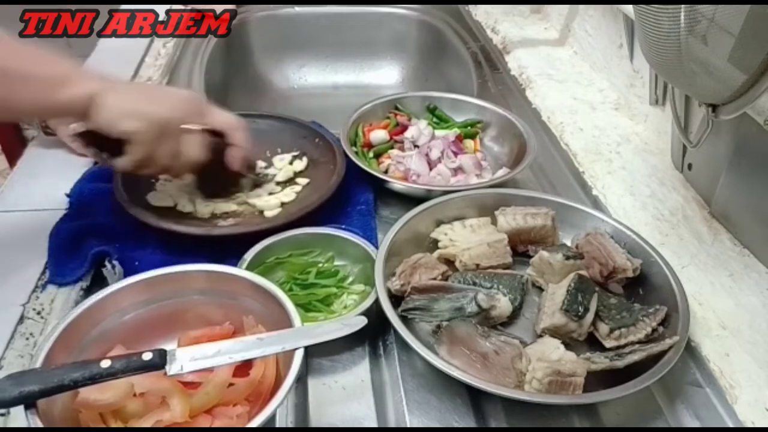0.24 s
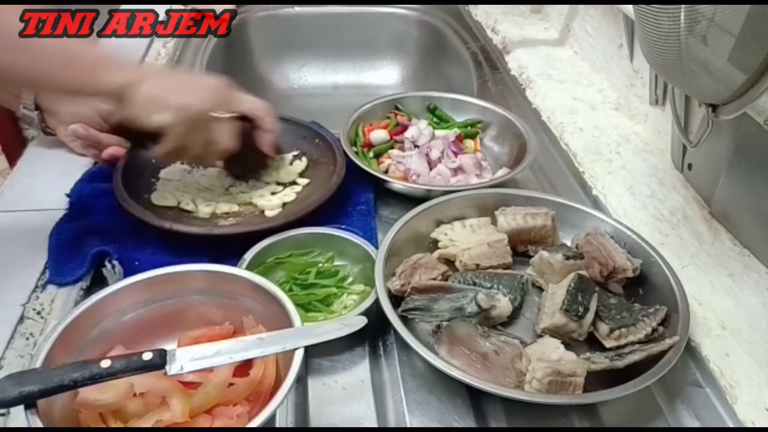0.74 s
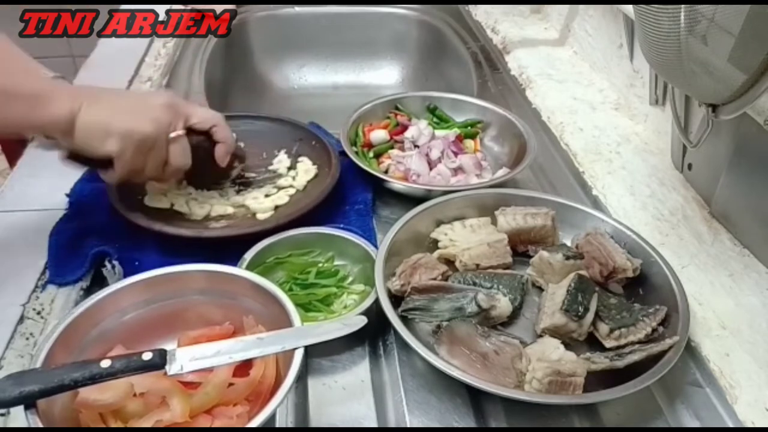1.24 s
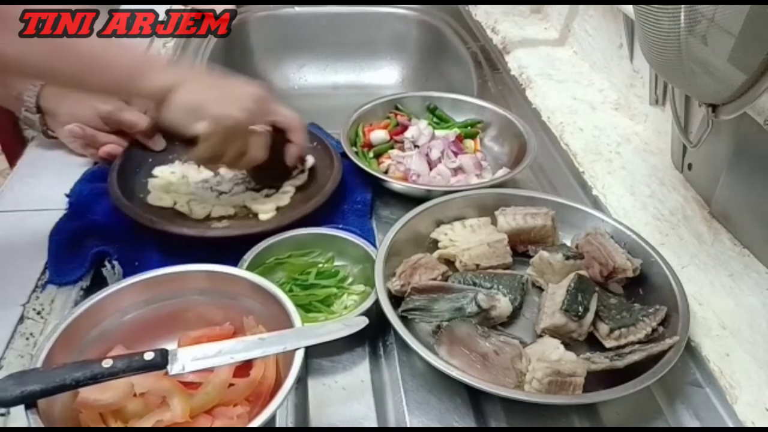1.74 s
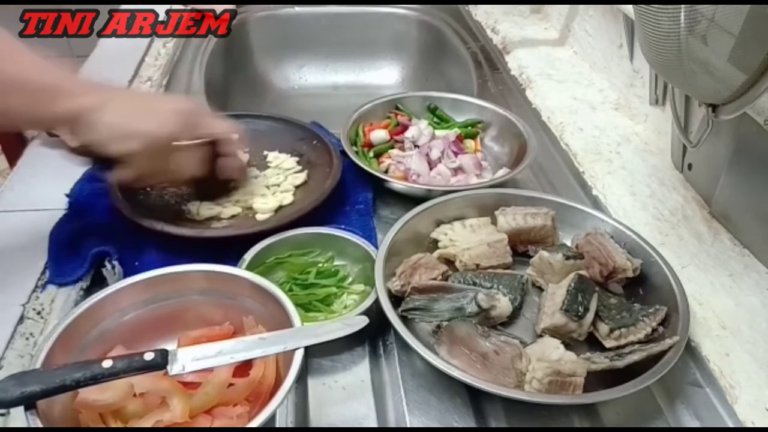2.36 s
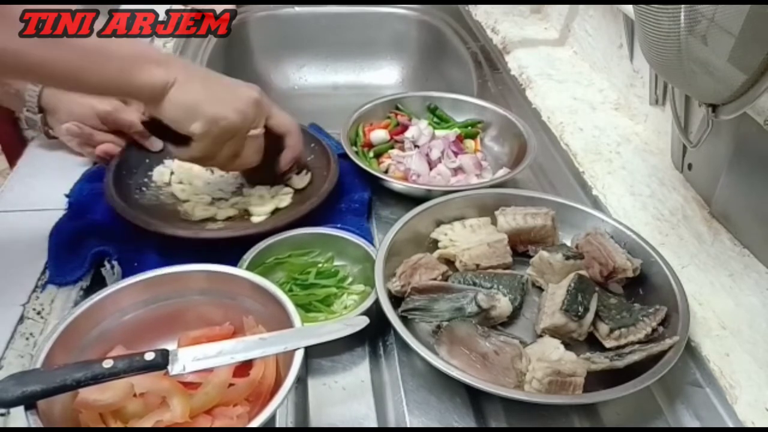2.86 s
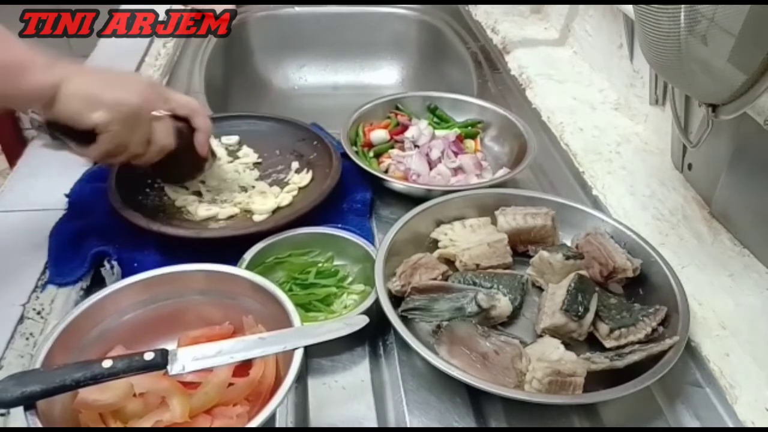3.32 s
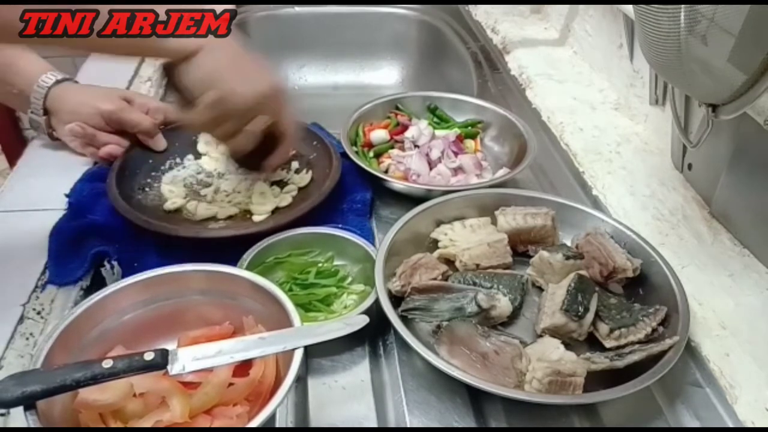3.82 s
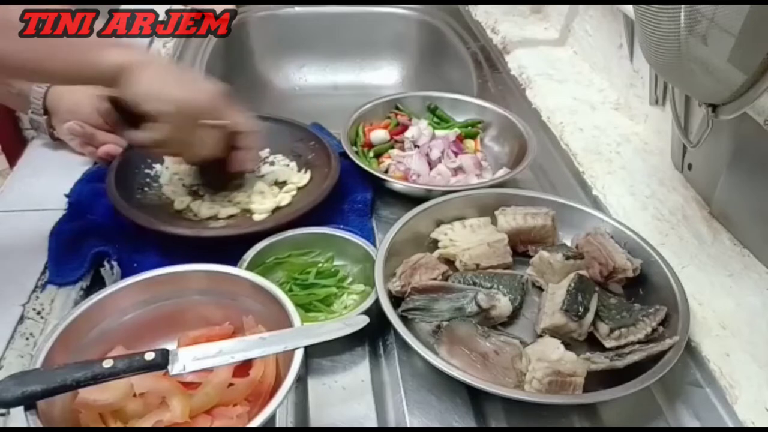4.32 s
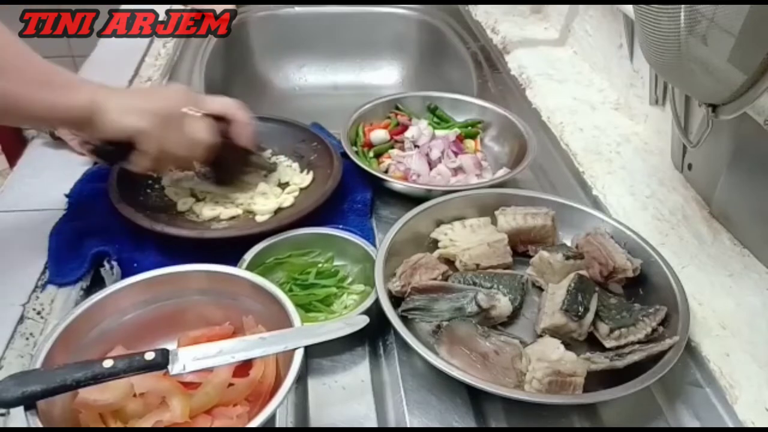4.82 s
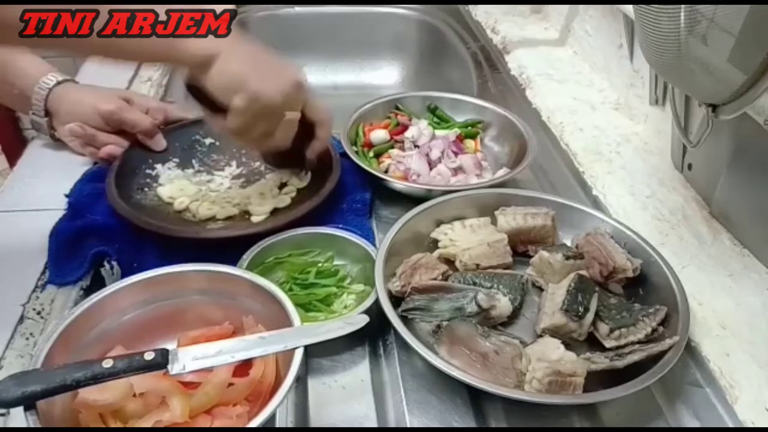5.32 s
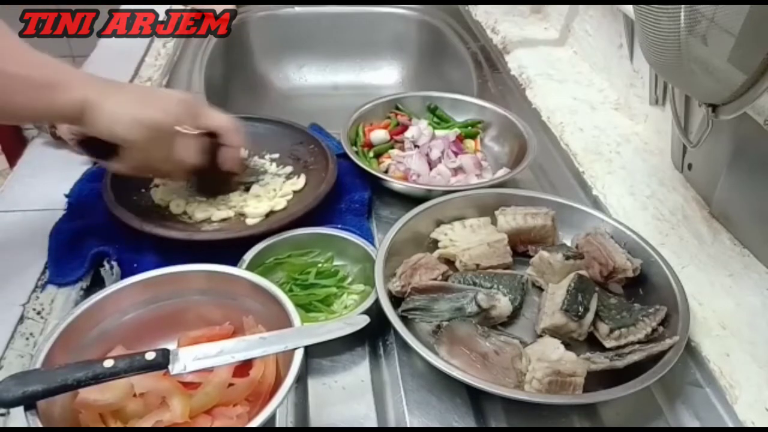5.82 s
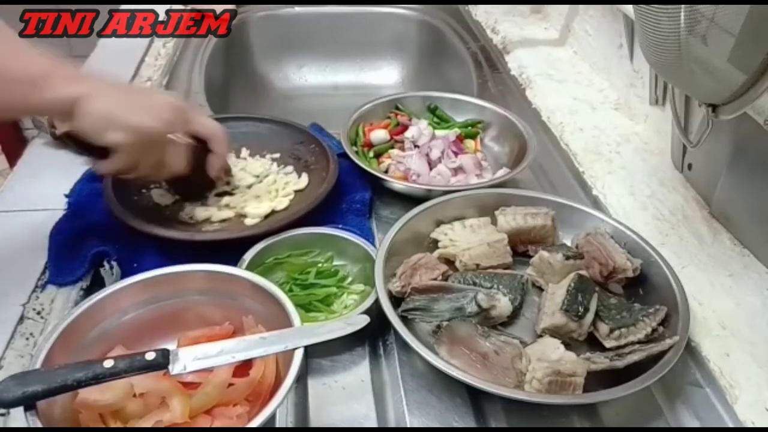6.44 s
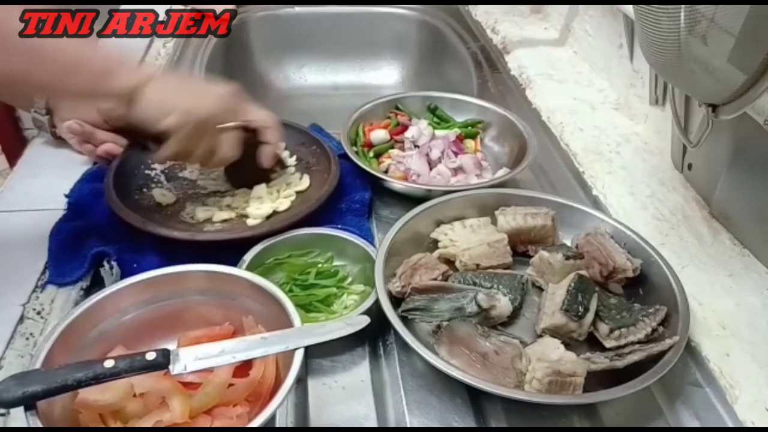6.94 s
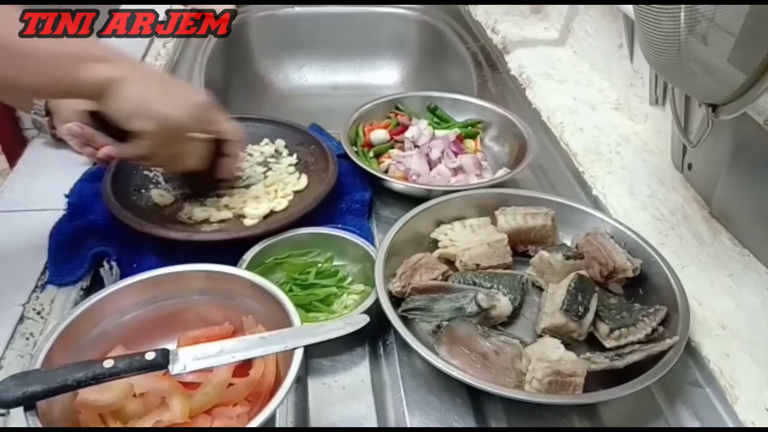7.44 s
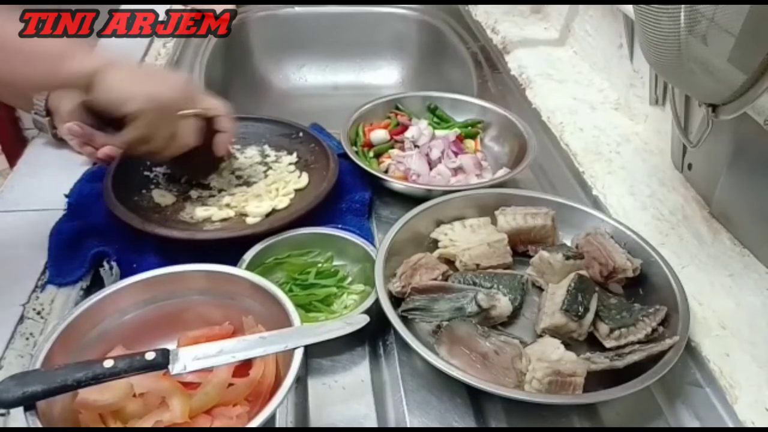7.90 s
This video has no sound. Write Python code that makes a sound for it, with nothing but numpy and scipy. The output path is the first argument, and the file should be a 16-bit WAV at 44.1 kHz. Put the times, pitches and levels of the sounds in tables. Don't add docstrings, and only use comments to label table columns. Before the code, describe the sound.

Gritty stone-on-stone rubbing runs throughout, several strokes a second, alternating heavy crushing rasps with lighter hissy drags. Two firm knocks open the first second, a bracelet clinks on the rim, and the hardest knock falls at five seconds. Later strokes grow softer and duller, with low rattles and hollow tocks. Short kitchen echoes surround the close phone sound.

```python
import sys
import numpy as np
from scipy import signal
from scipy.fft import rfft, irfft, next_fast_len
from scipy.io import wavfile
from scipy.ndimage import uniform_filter1d

SR = 44100
rng = np.random.default_rng(int(sys.argv[2]) if len(sys.argv) > 2 else 0)


def to_wav(s):
    ch = np.atleast_2d(s).T
    pcm = np.round(np.clip(ch, -1, 1) * 32767)
    wavfile.write(sys.argv[1], SR, pcm.astype(np.int16))


def convert_level_to_amplitude(level_db):
    exponent = np.asarray(level_db, float) / 20
    return 10 ** exponent


N = 360297


def evened(x):
    return x / np.sqrt(np.mean(np.atleast_2d(x).mean(0) ** 2) + 1e-20)


def read(points, hz):
    f, value = np.transpose(points)
    return np.interp(np.log(hz + 1), np.log(f + 1), value)


def colour(x, points, lo_hz=0, hi_hz=3e4):
    size = next_fast_len(N + 4096)
    hz = np.fft.rfftfreq(size, 1 / SR) + 1
    edges = np.sqrt(1 / (1 + (lo_hz / hz) ** 6) / (1 + (hz / hi_hz) ** 6))
    return irfft(rfft(x, size) * convert_level_to_amplitude(read(points, hz)) * edges, size)[..., :N]


def ring(x, hz, width):
    r = np.exp(-np.pi * width / SR)
    return signal.lfilter([1 - r * r, 0, r * r - 1], [2, -4 * r * np.cos(2 * np.pi * hz / SR), 2 * r * r], x)


def drift(rate):
    knots = np.arange(int(N / SR * rate) + 2) / rate
    return np.interp(np.arange(N) / SR, knots, rng.standard_normal(len(knots)))


def struck(hits, modes):
    t = np.arange(16000) / SR
    out = np.zeros(N)
    for at, hit_db in hits:
        decay = 0
        for hz, db, t60 in modes:
            envelope = convert_level_to_amplitude(hit_db + db + rng.standard_normal() - 60 * t / t60)
            onset = np.minimum(t * hz / 3, 1)
            decay = decay + envelope * onset * np.sin(2 * np.pi * hz * t)
        part = out[round(at * SR):][:len(t)]
        part += decay[:len(part)]
    return out


# peak [t/s], rubbing [level/dB], rise [t/s], fall [t/s],
# low body re rubbing [level/dB]
CRUSHING_STROKES = [(0.584, -34.5, 0.061, 0.12, -8), (1.353, -29, 0.059, 0.059, -13.5),
                    (1.593, -36.5, 0.04, 0.12, -8), (2.014, -28.5, 0.082, 0.091, -10.5),
                    (2.709, -35.5, 0.016, 0.087, -8), (3.399, -31, 0.052, 0.11, -8),
                    (3.768, -29, 0.071, 0.08, -6.5), (3.913, -29.5, 0.031, 0.074, -16.5),
                    (4.057, -32.5, 0.067, 0.087, -10), (4.647, -29, 0.044, 0.044, -10),
                    (4.783, -33.5, 0.11, 0.097, -10.5), (5.18, -30, 0.1, 0.081, -5),
                    (5.499, -37.5, 0.1, 0.085, -3.5), (5.9, -33.5, 0.083, 0.081, -6.5),
                    (6.057, -36, 0.07, 0.052, -1.5), (6.181, -39.5, 0.089, 0.098, -1.5),
                    (6.525, -29, 0.02, 0.1, -9.5), (6.748, -36.5, 0.057, 0.033, -24),
                    (6.886, -38, 0.18, 0.078, -6.5), (7.128, -43.5, 0.099, 0.03, -2),
                    (7.244, -35, 0.088, 0.095, -2.5), (7.608, -38.5, 0.15, 0.12, 2),
                    (7.778, -38, 0.049, 0.082, -9.5), (7.917, -39, 0.13, 0.069, -3.5)]
DRAWING_STROKES = [(0, -92.5, 0.02, 0.05, -3), (0.208, -44, 0.082, 0.02, -22.5),
                   (0.262, -47.5, 0.023, 0.027, -27), (0.348, -38.5, 0.12, 0.06, -9.5),
                   (0.476, -47.5, 0.043, 0.068, -6.5), (0.972, -37.5, 0.067, 0.13, -12.5),
                   (1.197, -40.5, 0.054, 0.065, -51), (1.51, -42, 0.18, 0.045, -16.5),
                   (1.831, -58, 0.02, 0.14, 3), (1.901, -40, 0.068, 0.067, -11.5),
                   (2.3, -66.5, 0.02, 0.033, -1), (2.382, -33.5, 0.064, 0.13, 0),
                   (2.44, -34.5, 0.032, 0.046, -9), (2.563, -45, 0.043, 0.099, -26),
                   (2.981, -41, 0.048, 0.12, -15), (3.13, -31, 0.062, 0.073, -8.5),
                   (3.278, -37.5, 0.061, 0.065, -2.5), (3.683, -63.5, 0.029, 0.035, -10),
                   (4.349, -37, 0.067, 0.083, -9.5), (4.472, -36.5, 0.044, 0.13, -6),
                   (5.391, -43.5, 0.11, 0.02, -19), (5.778, -43, 0.091, 0.02, -10),
                   (6.598, -44, 0.12, 0.019, 1), (7.506, -45.5, 0.056, 0.11, 7)]
# start [t/s], rubbing [level/dB], fall [t/s],
SKIDS = [(0.094, -35.5, 0.08, 5, -22), (0.879, -30, 0.048, 0, -12), (2.649, -34.5, 0.034, -4.5, -13),
         (2.916, -45.5, 0.069, 8.5, -12), (4.269, -49, 0.12, 7.5, -7), (5.0441, -32, 0.042, 6, -21),
         (5.677, -46.5, 0.13, 9.5, -11), (6.448, -44, 0.052, 9, -2.5), (7.445, -46.5, 0.18, -5, -15),
         (7.983, -59.5, 0.08, 8, -15.5), (8.117, -51, 0.2, 3.5, -14)]


def strokes():
    t = np.arange(0, N + 32, 32) / SR
    skid_rise_s, body_lag_s = 0.0038, 0.0033
    swell_at_rise_db, swell_curve = -22.5, 1.316
    skids = [(s, db, skid_rise_s, fall, body_db) for s, db, fall, body_db, _ in SKIDS]
    skid_fine_db = np.array(SKIDS)[:, 4:]
    # rows, fine grit [dB re rubbing], push on the counter [dB re rubbing]
    kinds = (CRUSHING_STROKES, -9.5, -12), (DRAWING_STROKES, -3, -11.5), (skids, skid_fine_db, -34)
    power = 0
    for rows, fine_db, push_db in kinds:
        s, db, rise, fall, body_db = np.transpose(rows)[..., None]

        def swell_db(u):
            return swell_at_rise_db * (abs(u) / np.where(u < 0, rise, fall)) ** swell_curve

        scrape_swell_db = swell_db(t - s)
        body_swell_db = swell_db(t - s - body_lag_s)
        extra_db = db + 33
        layers_db = [
            push_db - 0.26 * extra_db + 0.15 * (body_db + 12.5) + 0.84 * body_swell_db,
            body_db + 1.31 * body_swell_db,
            scrape_swell_db,
            fine_db - 0.42 * extra_db + 0.87 * scrape_swell_db]
        power = power + (convert_level_to_amplitude(np.maximum(db + np.array(layers_db), -200)) ** 2).sum(1)
    return [np.interp(np.arange(N) / SR, t, p) for p in power]


def grit(per_s=2500, spread_db=4.5, smooth=0.72):
    sizes = convert_level_to_amplitude(spread_db * np.minimum(rng.exponential(1, N), 4))
    clicks = rng.standard_normal(N) * (rng.random(N) < per_s / SR) * sizes
    return evened(clicks) + smooth * rng.standard_normal(N)


# centre [f/Hz], width [f/Hz], over the broad colour [level/dB]
STONE_MODES = [(291, 32.7, 3.5), (467, 26.7, 8), (592, 28.5, 5), (694, 28, -1), (891, 20, -4.5),
               (1182, 22, 6), (1340, 38.5, 2.5), (1727, 48, 3), (1869, 23.3, 7), (2066, 44, 2),
               (2156, 60, 3), (2348, 126, 8.5), (2451, 130, 3), (2400, 44, -4), (2710, 210, -13),
               (3370, 66, 8.5), (3520, 170, 4), (4670, 166, 4.5), (5860, 157, 1.5), (6213, 94, 6),
               (8100, 820, 2)]


def stone(drive, wander_db=4.0):
    modes = 0
    for k, (hz, width, db) in enumerate(STONE_MODES):
        wandering = drive * convert_level_to_amplitude(wander_db * drift(9.))
        modes = modes + (-1) ** k * convert_level_to_amplitude(db) * ring(wandering, hz, max(width, 45 + 0.015 * hz))
    return 0.38 * drive + modes


# [t/s], peak [level/dB], low thud re peak [level/dB]
PASTE_CATCHES = [(0.249, -22, -31), (1.1603, -55, -28), (1.5698, -33, -10), (2.3256, -25.5, 2.5),
                 (2.3543, -32, 14), (3.7123, -19, -29), (3.906, -15.5, -32), (4.279, -38, 8),
                 (4.4443, -28.5, -28), (4.6144, -35, 1), (4.6439, -19, -4.5), (5.1412, -24.5, 1.5),
                 (5.6942, -29.5, 9.5), (6.5204, -30.5, -23), (6.859, -21.5, -1.5), (7.1053, -33, 7),
                 (8.1534, -46, -4)]
# [f/Hz], per Hz [level/dB]
STONE_COLOUR = [(150, -16.5), (230, 0), (400, -12), (700, -10.5), (1100, -14), (1600, -6.5), (2400, 0.5),
                (3100, -4.5), (4300, -11), (5300, -11), (6200, -7), (7000, -13.5), (9000, -24),
                (15500, -34.5)]


def pestle(push, body, scrape, fine):
    t, catch_t60_s = np.arange(6000) / SR, 0.028
    for at, db, thud_db in PASTE_CATCHES:
        start = round(at * SR)
        burst = np.zeros(N)
        burst[start:][:6000] = convert_level_to_amplitude(db - 6 - 60 * t[:N - start] / catch_t60_s) ** 2
        body = body + burst * convert_level_to_amplitude(thud_db) ** 2
        scrape = scrape + burst
        fine = fine + 0.032 * burst
    grains = np.array([grit(), grit()])
    bands = (push, 170, 430), (body, 430, 1100), (scrape, 1100, 4000), (fine, 4000, 3e4)  # power, f/Hz
    face, rim = sum(np.sqrt(power) * evened(colour(grains, STONE_COLOUR, lo_hz, hi_hz))
                    for power, lo_hz, hi_hz in bands)
    return convert_level_to_amplitude(-8.5) * stone(face), convert_level_to_amplitude(-8.5) * rim


# [t/s], peak [level/dB], pitch of the crack [f/Hz],
# rattle re crack [level/dB], rattle centre [f/Hz]
STONE_KNOCKS = [
    (0.095, -7, 1950, -7.5, 2220),
    (0.88, -5, 1980, -11, 2260),
    (2.914, -22.5, 2800, -13, 2600),
    (4.27, -22.5, 2000, -7, 735),
    (5.0437, -3, 2130, -10, 1890),
    (5.677, -18, 1980, 6, 646),
    (6.451, -21, 2120, 8.5, 666),
    (8.118, -35, 2050, 2.5, 748),
]


def knocks():
    out = np.zeros(N)
    t = np.arange(-60, 2000) / SR
    for at, db, hz, rattle_db, rattle_hz in STONE_KNOCKS:
        crack = -np.cos(2 * np.pi * hz * t + 0.89) * np.exp(-(t * hz / 0.61) ** 2)
        rattle = (t > 0) * convert_level_to_amplitude(rattle_db - 60 * t / 0.013) * rng.standard_normal(len(t))
        band = signal.butter(3, [rattle_hz * .45, rattle_hz * 1.9], "band", fs=SR, output="sos")
        out[round(at * SR) - 60:][:len(t)] += convert_level_to_amplitude(db) * (crack + signal.sosfilt(band, rattle))
    return out


# [f/Hz], [level/dB], [t60/s]
BOWL_MODES = [(700, -9, .2), (1981, 0, .6), (2353, -6, .4), (2536, -12, .4), (3144, -12, .35),
              (4032, -5, .5), (4525, -7, .5), (5389, -9, .5), (5787, -7, .45), (6158, -10, .45)]
# [t/s], [level/dB]
BOWL_JOLTS = [
    (.66, -56),
    (4.11, -54),
    (7.96, -61),
]


def bowls(drive):
    singing = sum(convert_level_to_amplitude(db) * ring(drive, hz, 1.23 / t60) * np.sqrt(t60) for hz, db, t60 in BOWL_MODES)
    return convert_level_to_amplitude(-21) * singing + struck(BOWL_JOLTS, BOWL_MODES)


# [f/Hz], [level/dB], [t60/s]
BRACELET_MODES = [(1391, -22, 0.2), (4834, -12, .06), (6062, -2, 0.07), (6170, -5, 0.07), (7068, -20, .05),
                  (7790, -14, .06), (9249, -20, 0.054), (10131, -25, 0.04), (10729, -23, .04),
                  (11859, -25, 0.04), (12328, -30, .03), (13383, -27, 0.04), (14998, -31, .04)]
# [t/s], [level/dB]
BRACELET_TAPS = [
    (2.432, -38.5),
    (2.437, -21.5),
    (2.447, -23.5),
    (2.457, -58.5),
    (2.472, -68),
]


def bracelet():
    return struck(BRACELET_TAPS, BRACELET_MODES)


# [t/s], [level/dB], [f/Hz], [t60/s]
LONE_NOTES = [(0.333, -32, 91, 0.13), (1.621, -33, 91, 0.23), (2.43, -37, 70, 0.22), (3.78, -39, 75, 0.34),
              (6.299, -54, 121, 0.18), (6.446, -34.5, 106, 0.18), (4.281, -25, 806, 0.04),
              (4.345, -32.5, 750, 0.058), (5.618, -41.5, 2480, 0.077), (5.653, -55, 2510, 0.055),
              (6.386, -66.5, 4470, 0.23), (7.5, -28, 877, 0.074), (7.58, -32, 865, 0.1),
              (8.03, -53, 749, 0.58), (8.118, -46, 724, 0.12), (8.148, -39, 880, 0.13),
              (7.455, -41, 896, 0.56), (2.473, -41, 1370, 0.13), (2.914, -34, 3520, 0.026),
              (5.043, -19.5, 3300, 0.034)]


def lone_notes():
    return sum(struck([(at, db)], [(hz, 0, t60)]) for at, db, hz, t60 in LONE_NOTES)


# [f/Hz], per Hz [level/dB]
COUNTER_COLOUR = [(40, -26), (58, 0), (70, -21.5), (85, 6), (104, 5), (130, 3.5), (170, -5.5), (230, -48)]


def counter(push):
    power = convert_level_to_amplitude(-58.5) ** 2 + convert_level_to_amplitude(-6) ** 2 * uniform_filter1d(push, 2500)
    return evened(colour(rng.standard_normal(N), COUNTER_COLOUR)) * np.sqrt(power)


# [f/Hz], [t60/s]
KITCHEN_DECAY = [(150, 0.059), (600, 0.11), (2000, 0.037), (6000, 0.032), (15000, 0.29)]
# [f/Hz], [level/dB]
KITCHEN_SHARE = [(100, -26), (190, -16), (300, -3), (1000, 2), (4000, 3), (12000, -2)]


def kitchen(x):
    taps = np.zeros((6, 12000))
    at = np.arange(60, 11980, 20) + rng.integers(0, 20, (6, 596))
    np.put_along_axis(taps, at, rng.choice([-1., 1.], at.shape), 1)
    hz, t, z = signal.stft(taps, SR, nperseg=256)
    fade = convert_level_to_amplitude(-60 * t / read(KITCHEN_DECAY, hz)[:, None])
    fade *= convert_level_to_amplitude(read(KITCHEN_SHARE, hz))[:, None] / np.sqrt((fade ** 2).sum(1, keepdims=True))
    tail = signal.istft(z * fade, SR, nperseg=256)[1] / np.sqrt(128 / 20)
    tail[:, :60] = 0
    spots_per_s = 1.7
    phase = spots_per_s * np.arange(N) / SR + np.arange(3)[:, None] * 2 / 3
    share = np.sqrt(2 / 3) * np.cos(np.pi * phase)
    return signal.oaconvolve((share * x)[:, None], tail.reshape(3, 2, -1), axes=2)[..., :N].sum(0)


# [f/Hz], [level/dB]
LEFT_RIGHT_TILT = [(60, -4.5), (130, 5), (290, -1), (640, 4.5), (1410, 2.5), (3100, 3.5), (6820, 3),
                   (15000, -4)]


def microphones(near, rim):
    lag = 8
    direct = np.array([near + rim, np.roll(near, lag) + np.roll(rim, lag + 1)])
    wet = direct + kitchen(near + convert_level_to_amplitude(1.5) * np.roll(rim, 900))
    tilt = np.array(LEFT_RIGHT_TILT) * [1, .5]
    return np.array([colour(wet[0], tilt), colour(wet[1], tilt * [1, -1])])


# [f/Hz], per Hz [level/dB]
HUSH_COLOUR = [(24, -41), (40, -2), (179, 4.5), (273, -2.5), (1050, -4.5), (3560, -18.5), (4130, -30),
               (4460, -28), (4800, -54.5), (15500, -71)]


def hush():
    a, b = rng.standard_normal((2, N))
    return convert_level_to_amplitude(-68.5) * evened(colour(np.array([a + .5 * b, a - .5 * b]), HUSH_COLOUR))


def thinned(x, keep=1.43, faint_db=-110, makeup_db=4):
    window = np.sin(np.pi * (np.arange(2048) + .5) / 2048)
    hz, _, z = signal.stft(x, SR, window, 2048, 1024)
    local = np.sqrt(abs(uniform_filter1d(abs(z) ** 2, size=40, axis=1)))
    luck = rng.random((43, z.shape[2] // 2 + 1))
    luck = np.repeat(luck, 24, 0).repeat(2, 1)[:1025, :z.shape[2]]
    kept = (abs(z) > keep * local) & (local > convert_level_to_amplitude(faint_db)) & (luck > .27)
    treble = z * (hz > 8000)[:, None]
    lines = treble * kept * convert_level_to_amplitude(makeup_db * hz[:, None] / 9000)
    full, thin = (signal.istft(part, SR, window, 2048, 1024)[1][:, :N] for part in (treble, lines))
    full_power, thin_power = (abs(uniform_filter1d(v ** 2, size=256, axis=1)) + 1e-16 for v in (full, thin))
    return x - full + thin * np.minimum(np.sqrt(5 * full_power / thin_power), 1)


def scene():
    push, body, scrape, fine = strokes()
    rubbing, rim = pestle(push, body, scrape, fine)
    near = rubbing + knocks()
    near = near + bowls(near) + bracelet() + lone_notes()
    return microphones(near, rim) + counter(push) + hush()


def low_pass(x):
    return signal.sosfilt(signal.butter(12, 15600, fs=SR, output="sos"), x)


def record(dry):
    mix = thinned(dry)
    return low_pass(mix)


dry = scene()
out = record(dry)
to_wav(out)
```